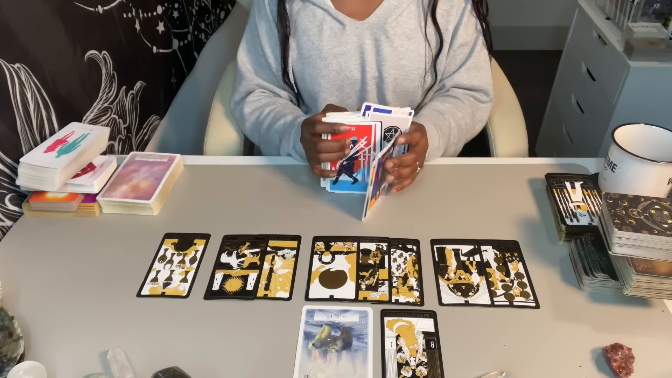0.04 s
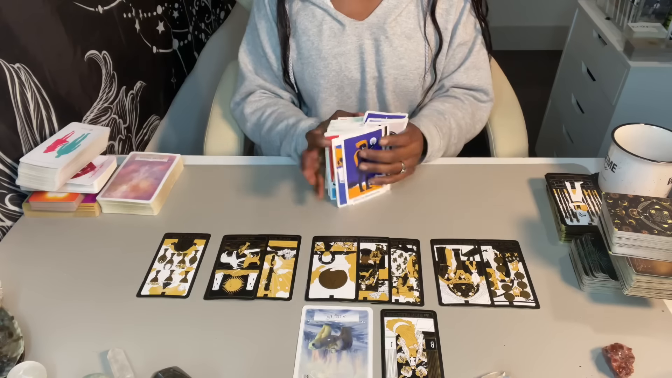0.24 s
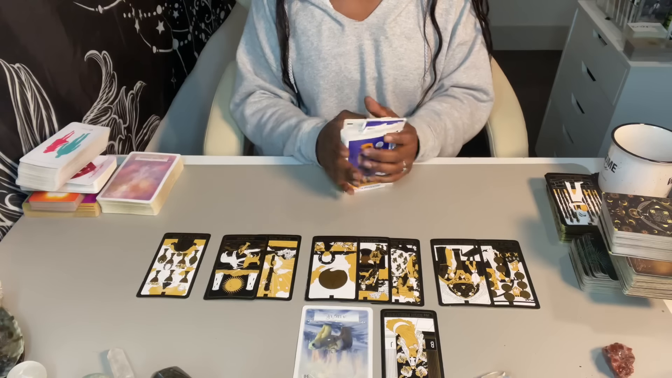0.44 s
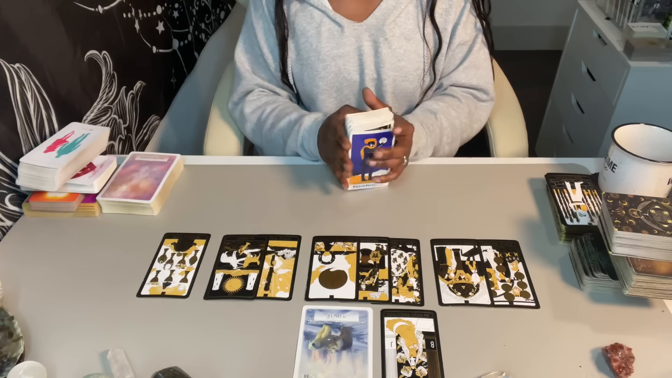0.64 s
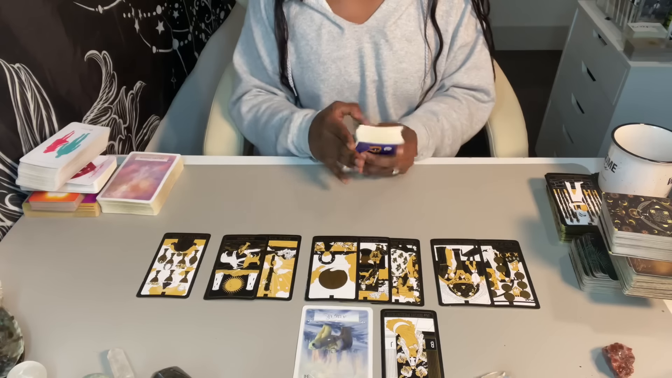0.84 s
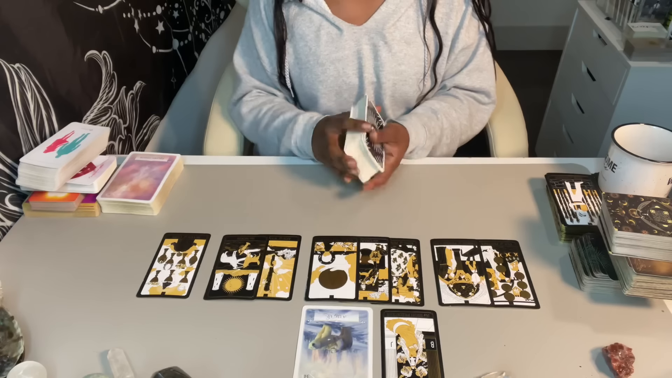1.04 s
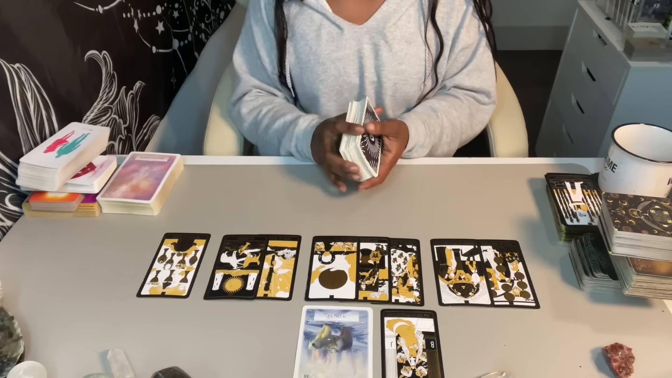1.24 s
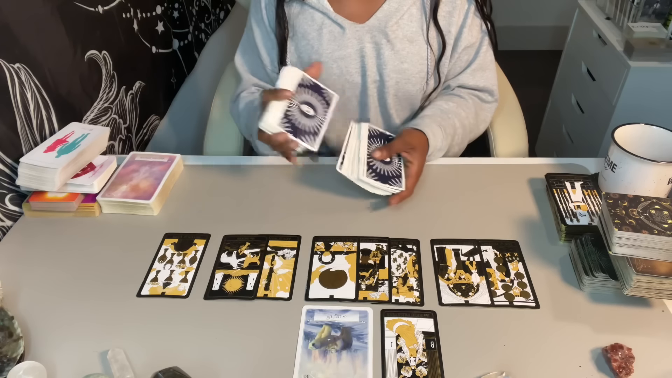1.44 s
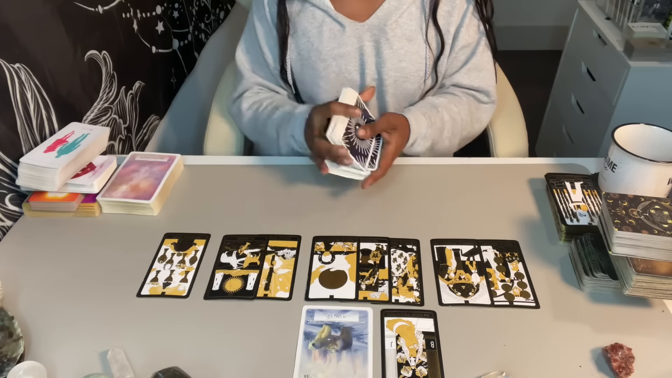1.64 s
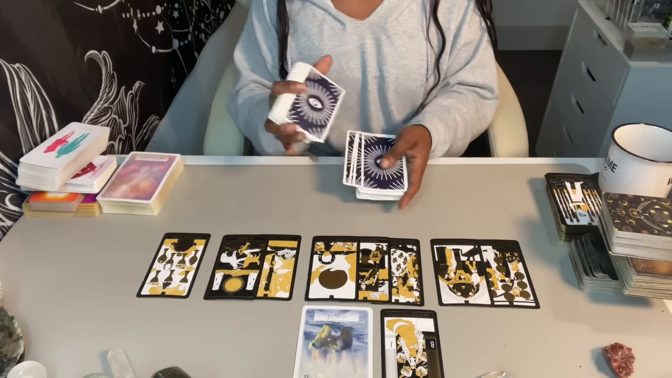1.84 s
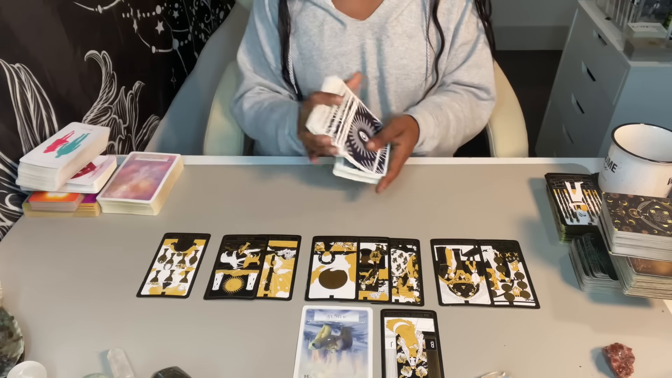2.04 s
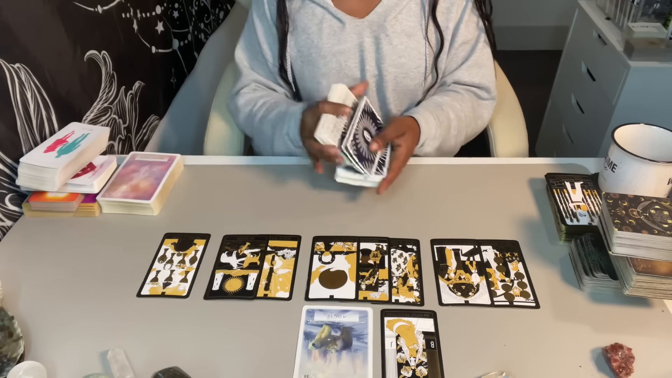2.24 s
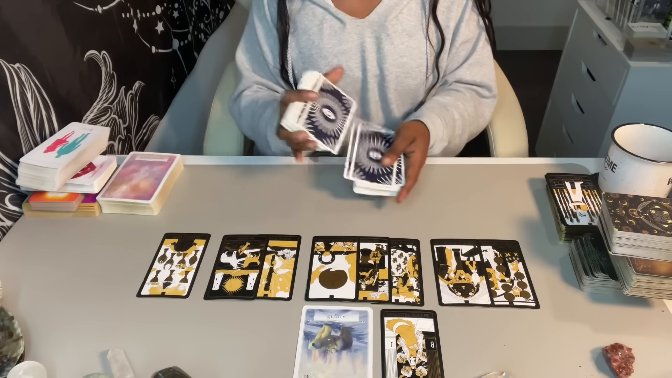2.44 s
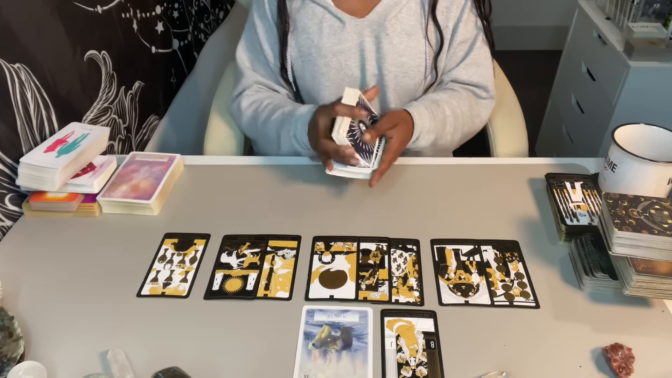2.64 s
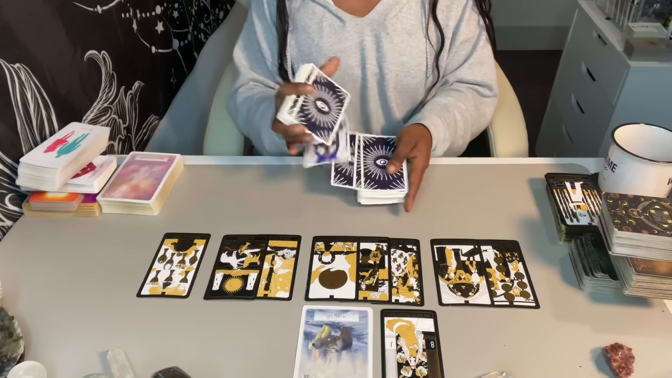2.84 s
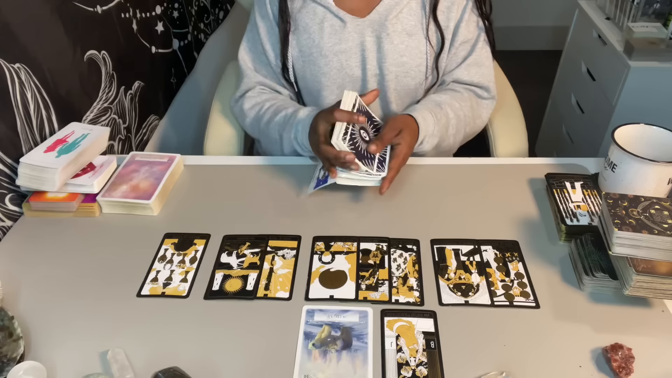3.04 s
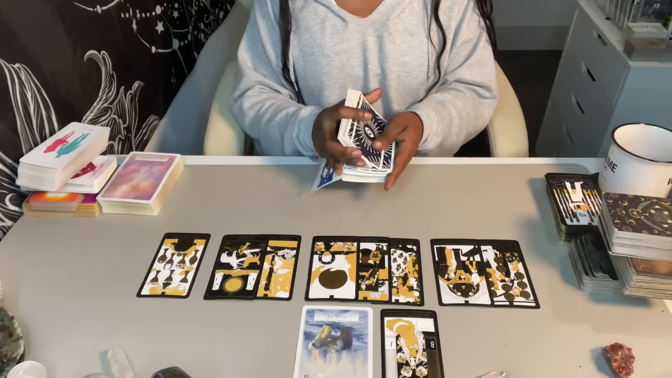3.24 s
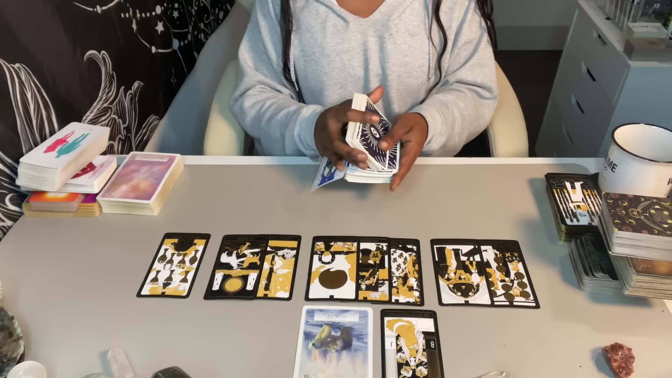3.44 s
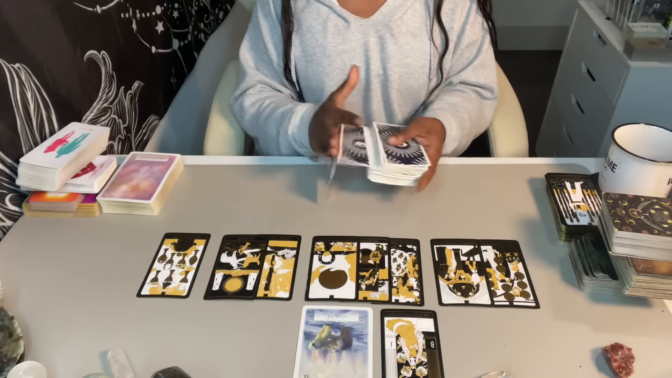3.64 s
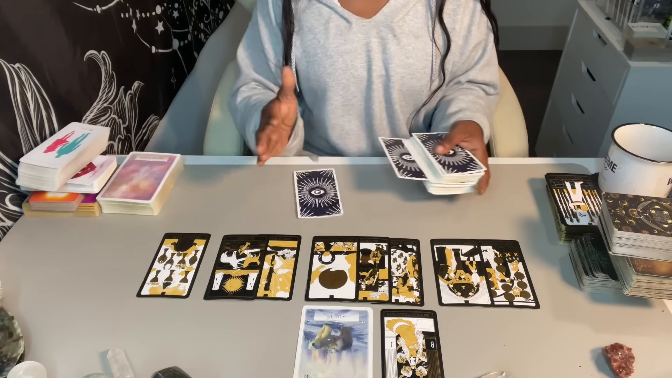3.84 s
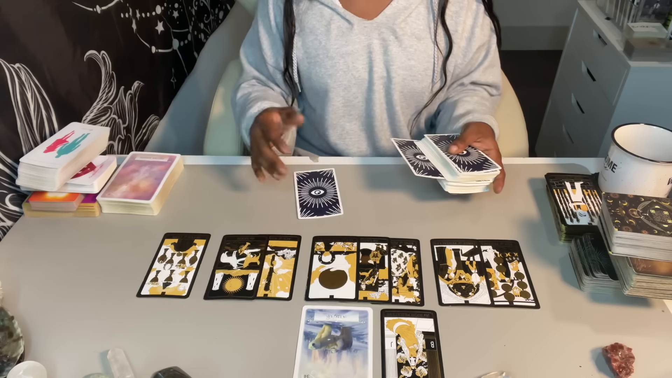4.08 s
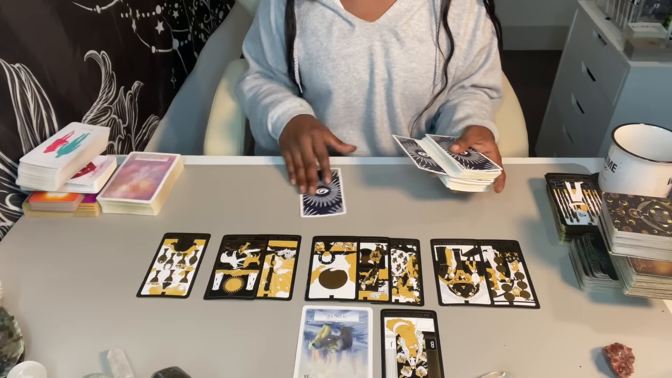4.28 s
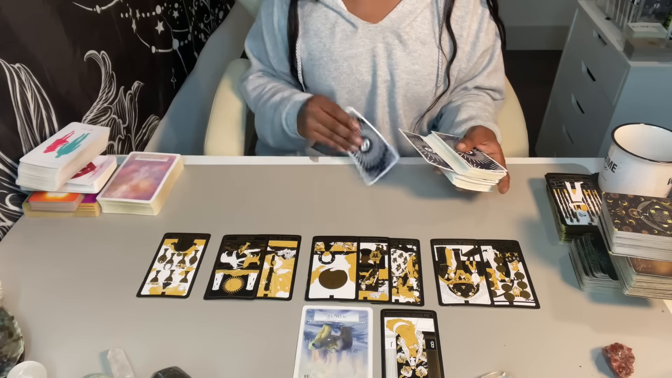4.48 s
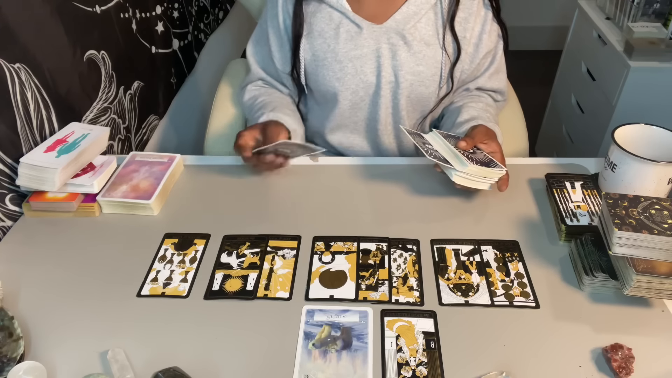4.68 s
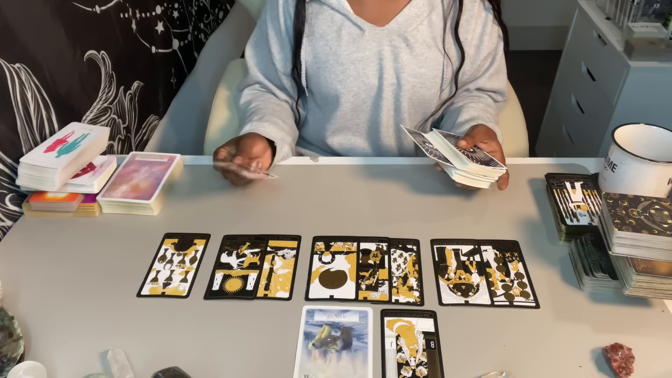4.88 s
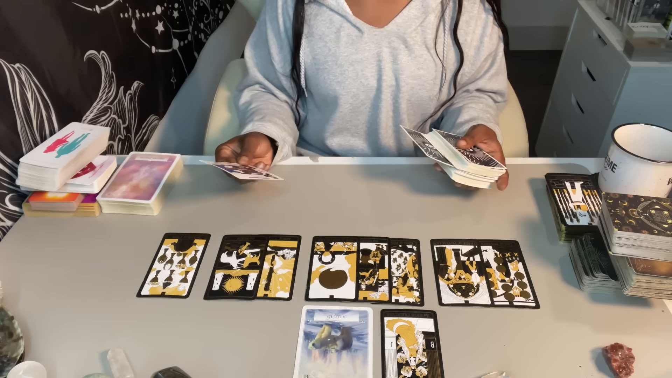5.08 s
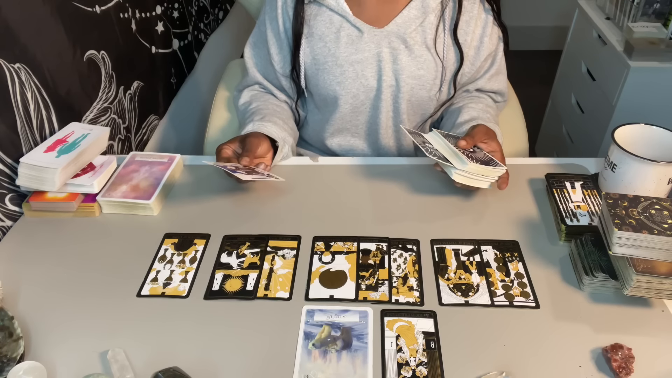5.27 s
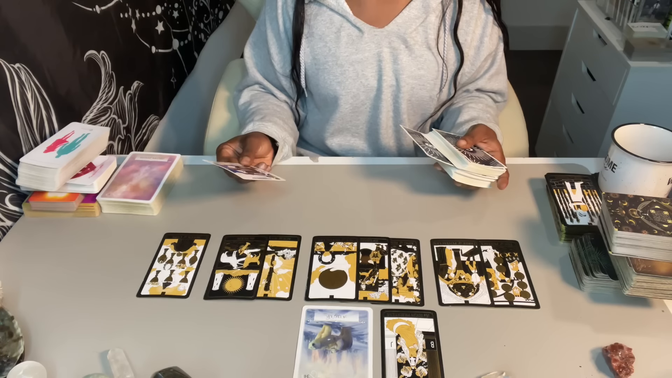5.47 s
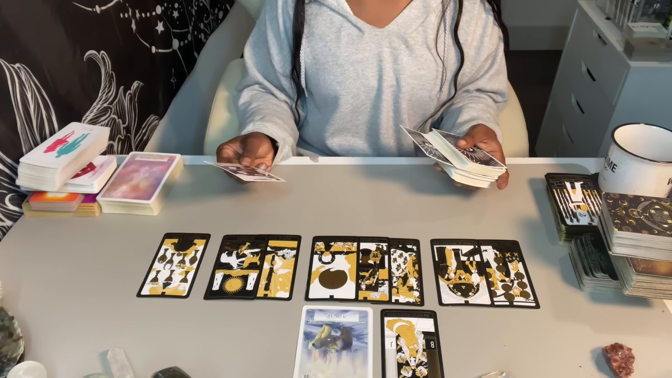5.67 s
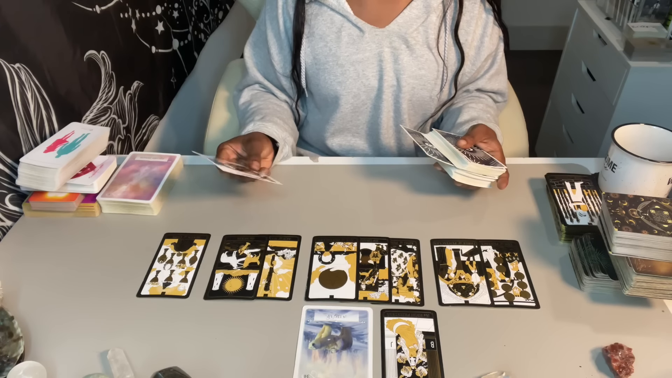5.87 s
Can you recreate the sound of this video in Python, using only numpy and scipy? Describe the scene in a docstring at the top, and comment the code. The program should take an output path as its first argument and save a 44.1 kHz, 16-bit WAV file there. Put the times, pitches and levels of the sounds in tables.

```python
"""In a small, live room, a deck of cards is squared and shuffled by hand above a table.
Friction makes the sliding packets hiss in grains; short impacts excite the flex of the cards as they snap.
One card is dragged off the table, as a noise-driven resonance that sinks in pitch, and lifted.
Cupped hands rub the deck to a hollow rumble and bump the table; mains hum and a fan run underneath."""
import sys
import numpy as np
from scipy import signal
from scipy.fft import rfft, irfft, next_fast_len
from scipy.io import wavfile
from scipy.ndimage import uniform_filter1d

SR = 44100
rng = np.random.default_rng(int(sys.argv[2]) if len(sys.argv) > 2 else 0)


def wav_record(signal):
    """Record a signal, one row per channel, as 16-bit PCM in the file named by sys.argv[1]."""
    frames = np.transpose(np.atleast_2d(signal))
    bounded = np.clip(frames, -1, 1)
    # unit amplitude maps onto the largest positive 16-bit level
    quanta = np.round(bounded * 32767).astype(np.int16)
    wavfile.write(sys.argv[1], SR, quanta)


N = 260631
TIME = np.arange(N) / SR

# a packet's edge striking the deck or table; a long contact means a loose packet:
# start_s, relative_level_db, flex_hz, flex_strength_db, tilt_db_per_octave, contact_ms
SNAP_EVENTS = [(0.2308, -34, 900, 20.5, 4, 1.8), (.246, -33, 2480, 16, -6, 3),
               (0.352, -34.5, 970, 13, -2, 1.9), (1.4449, -40.5, 800, 7, 0, 0.65),
               (1.657, -26, 2770, 16, 2.6, 0.95), (1.6693, -27, 900, 9.5, 0.7, 1.6),
               (1.7921, -37, 3180, -0.5, -0.5, 1.6), (1.81, -34, 735, 9, -1, 1.3),
               (1.98, -34, 3140, 13, 4.1, 2.2), (2.148, -41, 680, 7.5, -2.5, 6),
               (2.281, -26, 6360, 4, 5, 1), (2.302, -35, 2160, 0, -0.3, 2.8),
               (2.481, -23, 2170, 3.5, -0.5, 0.24), (2.482, -26, 1030, 16.5, -1, 1.5),
               (2.4874, -35.5, 750, 8.5, -5, 0.56), (2.53, -37, 1280, 15, -2, 0.8),
               (2.6557, -31, 2770, 14, 2.5, 2), (2.6688, -27.5, 2500, 7, 0.4, 1.24),
               (2.899, -34, 930, 9.5, 2, 0.97), (2.92, -30, 5390, -7.5, 2.5, 3.9),
               (2.957, -29, 3470, -1, 3.5, 1.6), (2.965, -21.5, 5140, -0.5, 2.5, 1.1),
               (2.975, -30, 1330, 11.5, -3.5, 1.25), (3.768, -30.5, 880, -9.5, -2.5, 0.98),
               (4.2942, -45.5, 3840, 18, 7.5, 0.42), (4.468, -46.5, 780, 27, -1.5, 1.2),
               (4.517, -36.5, 5500, 9.5, 2, 0.87), (4.7469, -47.5, 3950, -10, -3, 0.9)]
# left-right coherence of diffuse sound: frequency_hz, coherence (-1 to 1)
COHERENCE = [(120, 0.97), (220, 0.98), (380, 0.048), (800, 0.0085), (9000, -0.25), (13000, 1)]


def amp(db):
    """Level law: 20 dB is a factor of ten in amplitude."""
    return 10 ** (np.asarray(db) / 20)


def unit(x):
    """Normalization: scales a signal to rms 1."""
    return x / np.sqrt(np.mean(x ** 2) + 1e-20)


def read(points, hz):
    """Interpolation along a logarithmic frequency axis."""
    f, value = np.transpose(points)
    return np.interp(np.log(hz + 1), np.log(f), value)


def bins(size):
    """Fourier frequencies in Hz of a real signal of that many samples."""
    return np.fft.rfftfreq(size, 1 / SR)


def colour(x, points, tilt=0):
    """Spectral shaping: a zero-phase filter, tilted in dB per octave above 500 Hz, then rms 1."""
    size = next_fast_len(x.shape[-1])
    hz = bins(size)
    gain = amp(read(points, hz) + tilt * np.log2(np.maximum(hz, 500)))
    shaped = irfft(rfft(x, size) * gain, size)
    return unit(shaped[..., :x.shape[-1]])


def levelled(x, size):
    """Spectral whitening: evens the power over that many bins, so that all bands are driven alike."""
    spectrum = rfft(x)
    power = uniform_filter1d(abs(spectrum) ** 2, size=size)
    return irfft(spectrum / np.sqrt(power + 1e-20))


def wander(size, rate):
    """Slow random modulation: straight lines between normal random values, that many a second."""
    return np.interp(np.arange(size) * rate / SR, np.arange(4096), rng.standard_normal(4096))


def resonate(x, hz, width_hz):
    """Heterodyne resonance: a one-pole low-pass in a frame that turns at a pitch, fixed or moving."""
    turn = np.exp(2j * np.pi * np.cumsum(hz * np.ones(len(x))) / SR)
    pole = np.exp(-np.pi * width_hz / SR)
    return (turn * signal.lfilter([1 - pole], [1, -pole], x / turn)).real


def add(mix, s, sound):
    """Superposition: mixes a sound in from time s in seconds."""
    start = round(s * SR)
    sound = sound[max(-start, 0):]
    part = mix[max(start, 0):][:len(sound)]
    part += sound[:len(part)]


def diffuse(pair):
    """Stereo coherence: left and right share the lowest and highest bands; the middle is spread wide."""
    size = pair.shape[-1]
    alike = np.clip(read(COHERENCE, bins(size)), -1, 1)
    mid, side = rfft(pair) * np.sqrt([(1 + alike) / 2, (1 - alike) / 2])
    return irfft(np.array([mid + side, mid - side]), size)


def background(air_db=-57.0, waver_db=1.64, drift_turns=0.062, waver_rate=4):
    """Tonal and broadband noise: wavering hum lines in the soft rush of a fan."""
    # spectrum of the rush: frequency_hz, relative_level_db
    air = [(35, -10.5), (56, 8.5), (72, 0), (100, -10), (128, 3.5), (180, -16), (280, -6), (450, -16),
           (750, -13.5), (1100, -19.5), (1300, -25), (2100, -28.5), (2700, -38.5), (4000, -41), (7000, -50),
           (13500, -50), (15000, -68.5)]
    # steady tones of mains and fan, before the waver: frequency_hz, rms_level_db
    hum = [(59, -53.5), (85, -61.5), (120, -48.5), (240, -65.5), (295, -74.5), (705, -73), (883, -78),
           (1120, -75.5), (2003, -82.5)]
    out = amp(air_db) * colour(diffuse(rng.standard_normal((2, N))), air)
    for hz, db in hum:
        drift = drift_turns * np.sqrt(hz / 100) * wander(N, waver_rate)
        turns = hz * TIME + rng.random() + drift
        # the phase difference whose cosine is the coherence
        apart = np.arccos(np.clip(read(COHERENCE, hz), -1, 1)) * np.array([[0], [1]])
        level = np.sqrt(2) * amp(db + waver_db * wander(N, waver_rate))
        out += level * np.sin(2 * np.pi * turns + apart)
    return out


def bumps(table_hz=112, swell_s=0.012):
    """Damped oscillation: a soft push of the hand sets the table top swinging for a few cycles."""
    # soft bumps: start_s, envelope_peak_db
    bump_events = [(0.486, -63), (0.813, -34), (4.282, -43.5), (4.761, -41.5)]
    out, t = np.zeros(N), TIME[:SR // 4]
    envelope = t / swell_s * np.exp(1 - t / swell_s)
    for s, db in bump_events:
        add(out, s, amp(db) * envelope * np.sin(2 * np.pi * table_hz * t))
    return out


def stroke(t, length, depth_db=21, start_curve=0.77, fall_share=0.55):
    """Gesture envelope in dB: rises by depth_db over the length to t = 0, falls as far over a share of it."""
    rise = abs(t / length) ** start_curve
    return -depth_db * np.where(t < 0, rise, t / (fall_share * length))


def friction(size, grains_per_s=600, grain_spread_db=1.0, smooth_share=0.93, judder_db=2.5, judder_rate=130):
    """Stick-slip: paper fibres catch and let go in a juddering hiss with tiny clicks."""
    strength = amp(grain_spread_db * np.minimum(rng.exponential(1, size), 3.5))
    catches = (rng.random(size) < grains_per_s / SR) * strength
    clicks = unit(catches * rng.choice([-1., 1.], size))
    hiss = clicks + smooth_share * rng.standard_normal(size)
    return hiss * amp(judder_db * wander(size, judder_rate))


def rubbing(press_length_s=0.16, knocks_per_s=300, smooth_share=0.62, level_db=-4):
    """Cavity colouring: cupped hands turn knocks and rubbing of the deck into a hollow rumble."""
    # the palms pressing the deck square: hardest_press_s, relative_level_db
    presses = [(.01, -49.5), (0.332, -41.5), (0.502, -38), (0.612, -40.5), (.7, -45), (0.769, -44.5),
               (.845, -49)]
    # hollow colour of the hands: frequency_hz, gain_db
    rub_colour = [(60, -23), (130, 6), (185, -13), (262, 8), (335, -2.5), (420, -5.5), (550, -11.5),
                  (700, -6), (820, -16), (1020, -11.5), (1400, -25), (8000, -54)]
    force = np.sqrt(sum(amp(db + stroke(TIME - s, press_length_s)) ** 2 for s, db in presses))
    knocks = (rng.random(N) < knocks_per_s / SR) * rng.uniform(-0.91, 1, N)
    drive = unit(knocks) + smooth_share * rng.standard_normal(N)
    rumble = colour(drive, rub_colour)
    # evened over 900 samples: the grip never lets go
    steady = rumble / np.sqrt(uniform_filter1d(rumble ** 2, size=900) + 1e-20)
    return amp(level_db) * force * steady


def settlings(delay_s, length_s=0.045, level_db=-18, db_per_doubling=2, tilt=-4):
    """Sliding after impact: a loose packet rustles as it settles, louder for long contacts, duller than the snap."""
    return [(s + delay_s, db + level_db + db_per_doubling * np.log2(contact_ms), length_s, snap_tilt + tilt)
            for s, db, _, _, snap_tilt, contact_ms in SNAP_EVENTS]


def slides(settle_delay_s=0.017, level_db=-2.0):
    """Sliding friction: noise swells and fades with each stroke, and briefly after each snap."""
    # cards sliding on each other or through the fingers:
    # fastest_s, relative_level_db, length_s, tilt_db_per_octave
    slide_events = [(.065, -49, 0.12, -0.5), (.295, -46.5, 0.16, 0.2), (.485, -45, 0.044, 0),
                    (.62, -57.5, 0.06, -1), (.80, -47.5, 0.063, 2.5), (.89, -59.5, 0.14, 2),
                    (1.11, -64, 0.11, 5), (1.23, -70, 0.13, 6.5), (1.4, -61.5, 0.093, 5),
                    (1.437, -47.5, 0.033, 11), (1.795, -46.5, 0.11, 1), (2.085, -54.5, 0.031, 6),
                    (2.137, -45, 0.081, 6), (2.241, -44, 0.068, 2), (2.467, -46.5, 0.055, 5),
                    (2.82, -49.5, 0.16, 0.5), (2.955, -40, 0.0081, -3), (3.622, -48.5, 0.13, 2),
                    (3.662, -48.5, 0.056, 1.5), (4.787, -62, 0.16, 6.5)]
    # colour of paper friction: frequency_hz, gain_db
    slide_colour = [(100, 0.5), (400, 0), (900, 5.5), (1500, 2.5), (2400, 2), (6500, -1.5), (8000, -8),
                    (11000, -7), (14000, -14), (16000, -17)]
    out, size = np.zeros(N), 32768
    t = (np.arange(size) - size // 2) / SR
    after_snap = t > -settle_delay_s
    for rows, begun in (slide_events, 1), (settlings(settle_delay_s), after_snap):
        for s, db, length, tilt in rows:
            hiss = colour(friction(size), slide_colour, tilt)
            add(out, s + t[0], begun * amp(db + stroke(t, length) + level_db) * hiss)
    return out


def drag(level_db=-2.0, scratch_db=3.5, scratch_rate=90):
    """Cantilever resonance: a scratched card rings lower as more overhangs the edge, where it also rasps."""
    # the card dragged off the table's edge and lifted: time_s, relative_level_db
    drag_level = [(4.263, -76.5), (4.305, -62.5), (4.35, -55.5), (4.43, -59), (4.501, -55.5),
                  (4.517, -47.5), (4.531, -65.5), (4.7, -74)]
    # colour of the scratching: frequency_hz, gain_db
    drag_colour = [(300, -20), (750, -6.5), (1400, -8.5), (2300, -10.5), (3800, 5), (6300, 4.5), (8000, 0),
                   (11000, -1.5), (14000, -3.5), (16000, -16)]
    ring_hz, fall_octaves_per_s, width_hz, ring_db = 4860, 3.5, 670, -4
    rasp_s, rasp_length_s, rasp_hz, rasp_db = 4.485, 0.2, 2280, 30.5
    s, db = np.transpose(drag_level)
    hiss = colour(friction(N, grains_per_s=2700, judder_db=-1.0), drag_colour)
    hiss *= amp(scratch_db * wander(N, scratch_rate))
    # the pitch sinks until the loudest moment, then holds
    sliding_s = np.clip(TIME, s[0], s[np.argmax(db)]) - s[0]
    ring = amp(ring_db) * resonate(hiss, ring_hz * 2 ** (-fall_octaves_per_s * sliding_s), width_hz)
    rasp = resonate(resonate(hiss, rasp_hz, 2 * width_hz), rasp_hz, 2 * width_hz)
    rasp *= amp(rasp_db + stroke(TIME - rasp_s, rasp_length_s))
    level = np.interp(TIME, s, db, left=-150, right=-150) + level_db
    return amp(level) * (hiss + ring + rasp)


def snaps(flex_q=5, rise_share=1.0, chatter_db=-19, chatter_ms=6, level_db=-17.0):
    """Impact excitation: dense contacts of card edges make the flex ring briefly, then chatter."""
    # a single card's corner flicking past its neighbour: start_s, relative_level_db
    tick_events = [(0.206, -51.5), (0.2154, -44), (.699, -58.5), (2.4712, -38), (3.831, -51), (4.269, -59)]
    # a packet's flat face clacking on the deck, hollow in the hand: start_s, relative_level_db
    clack_events = [(1.675, -30), (1.791, -40.5), (1.982, -36.5), (2.655, -39.5), (2.673, -34)]
    # colour of all impacts: frequency_hz, gain_db
    snap_colour = [(100, -7), (300, -2), (600, -1.5), (1100, 0), (2000, -3.5), (4200, -4), (7500, -11),
                   (12000, -15.5), (16000, -27)]
    # shared by kind: flex_hz, flex_strength_db, tilt_db_per_octave, contact_ms
    ticks = [(s, db, 2480, -1, 1.1, 0.91) for s, db in tick_events]
    clacks = [(s, db, 1450, 12, -1, 2.1) for s, db in clack_events]
    out, size = np.zeros(N), 2048
    t, hz = (np.arange(size) - size // 8) / SR, bins(size) + 1
    ms = 1000 * t
    for s, db, flex_hz, flex_db, tilt, contact_ms in SNAP_EVENTS + ticks + clacks:
        blow = np.exp(np.where(ms < 0, ms / rise_share, -ms) / contact_ms)
        chatter = amp(chatter_db) * (ms > 0) * np.exp(-abs(ms) / chatter_ms)
        contacts = levelled(rng.choice([-1., 1.], size) * (blow + chatter), size=45)
        flex = 1 + amp(flex_db) / (1 + 1j * flex_q * (hz / flex_hz - flex_hz / hz))
        ringing = irfft(rfft(contacts) * flex)
        add(out, s + t[0], amp(db + level_db) * colour(ringing, snap_colour, tilt))
    return out


def room(x, wet_db=-2.5, early_db=-3, early_s=0.054, first_s=0.0006):
    """Reverberation: dense early echoes from table and nearby things, a tail dying faster in the treble, modes."""
    # reverberation time: frequency_hz, t60_s
    room_t60 = [(700, 0.5), (1800, 0.44), (4600, 0.41), (12000, 0.26)]
    # strength of the reverberation: frequency_hz, gain_db
    room_gain = [(300, 4), (700, 3.5), (1400, 6), (2200, 3), (6000, -3.5), (13000, -1.5)]
    # single notes that ring on in the reverberation after a blow: frequency_hz, relative_level_db
    room_modes = [(262, -31.5), (336, -25), (629, -34.5), (786, -30.5), (962, -32), (1342, -27.5),
                  (1592, -29), (1709, -25.5), (2406, -33), (3660, -30.5)]
    size = 32768
    t = np.arange(size) / SR
    taps = rng.standard_normal((2, size)) * (rng.random((2, size)) < .2) * (t > first_s)
    taps *= 1 + amp(early_db) * np.exp(-t / early_s)
    hz, when, z = signal.stft(taps, SR, nperseg=256)
    decay = amp(-60 * when / read(room_t60, hz)[:, None])
    tail = signal.istft(z * decay, SR, nperseg=256)[1][:, :size]
    tail = levelled(tail, size=130)
    tail /= np.linalg.norm(tail[0])
    for note_hz, db in room_modes:
        note = np.sin(2 * np.pi * (note_hz * t + rng.random((2, 1))))
        ring = note * amp(-60 * t / read(room_t60, note_hz))
        tail += amp(db) * ring / np.linalg.norm(ring[0])
    tail = irfft(rfft(diffuse(tail)) * amp(read(room_gain, bins(size))))[:, :SR // 2]
    return amp(wet_db) * signal.fftconvolve(x[None], tail, axes=1)[:, :N]


def echoes(x, passes_per_s=9, count=3, dry_s=2.484, dry_length_s=0.021, dry_db=-3.5):
    """Power-preserving crossfade: sound passes in turn between random tails, so no one tail's ringing stands out."""
    shares = [np.sqrt(2 / count) * np.sin(np.pi * (passes_per_s * TIME + k / count)) for k in range(count)]
    # one slap comes across drier: the level sent to the room dips briefly
    send = amp(dry_db * np.exp(-((TIME - dry_s) / dry_length_s) ** 2))
    return sum(room(share * send * x) for share in shares)


def direct(x, right_db=1.5):
    """Phase widening: the dry sound's left channel is turned in phase by an amount that varies with frequency."""
    # phase lead of the left channel: frequency_hz, phase_rad
    lead = [(300, 0.82), (1000, 0.44), (1300, 4.47), (2200, 5), (3500, 4.78), (4800, 4.03), (7500, 3.84),
            (10500, 5.62), (15000, 7.6)]
    size = next_fast_len(N)
    left = irfft(rfft(x, size) * np.exp(1j * read(lead, bins(size))), size)[:N]
    return np.array([left, amp(right_db) * x])


def scene():
    """Superposition: cards and hands, direct and reverberant, over table bumps, hum and fan."""
    cards = snaps() + slides() + drag() + rubbing()
    return direct(cards) + echoes(cards) + bumps() + background()


def record(dry, edge_hz=16000):
    """Band limitation: a linear-phase low-pass filter removes the highest treble."""
    lowpass = signal.firwin(511, edge_hz, window=("kaiser", 9), fs=SR)
    return signal.oaconvolve(dry, lowpass[None], "same")


dry = scene()
out = record(dry)
wav_record(out)
```